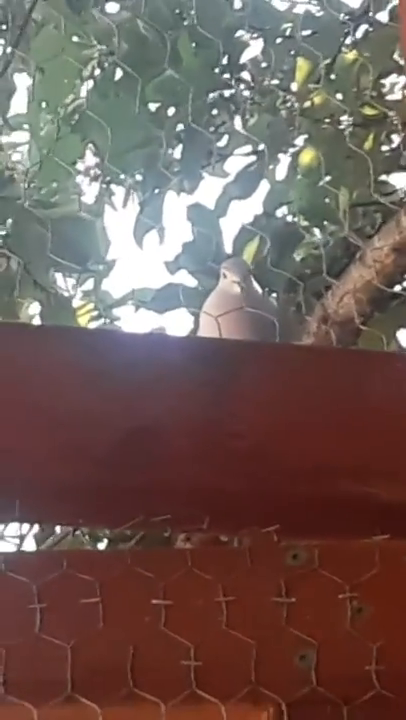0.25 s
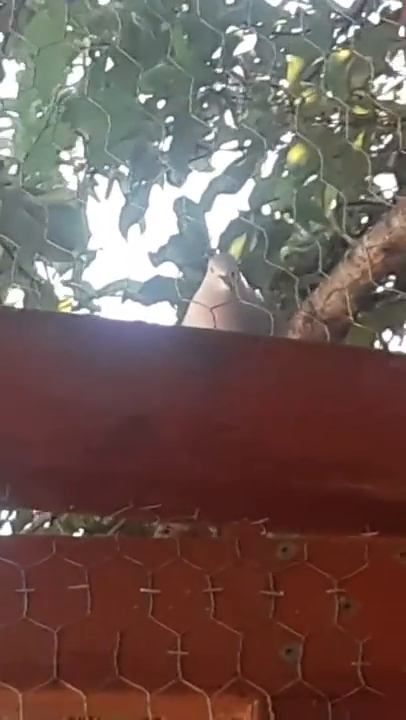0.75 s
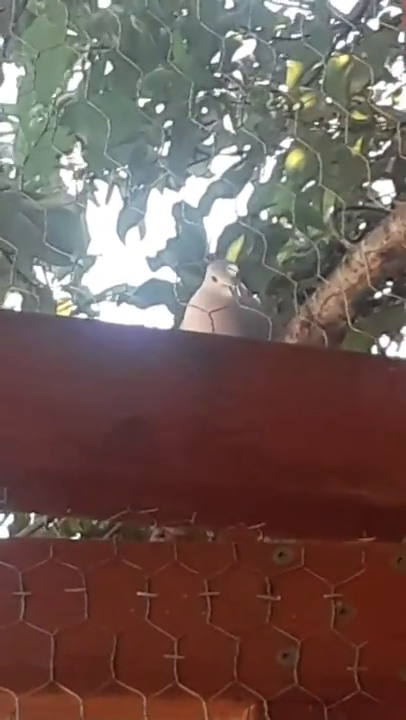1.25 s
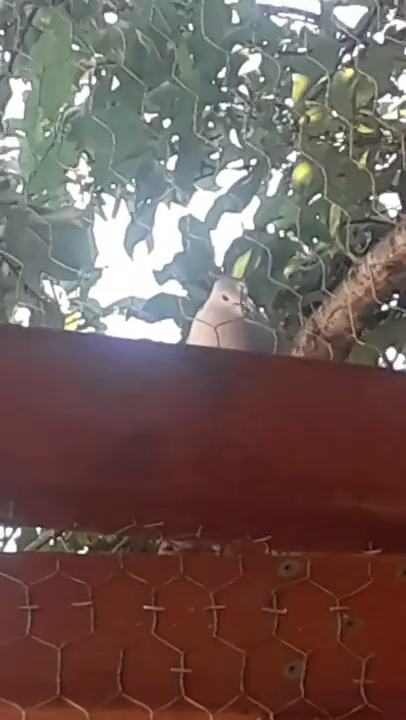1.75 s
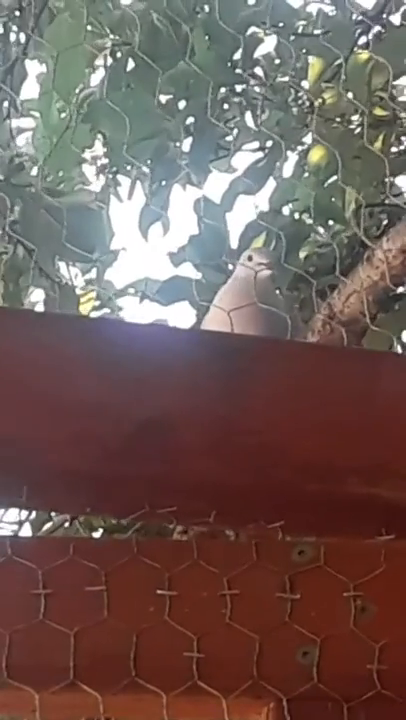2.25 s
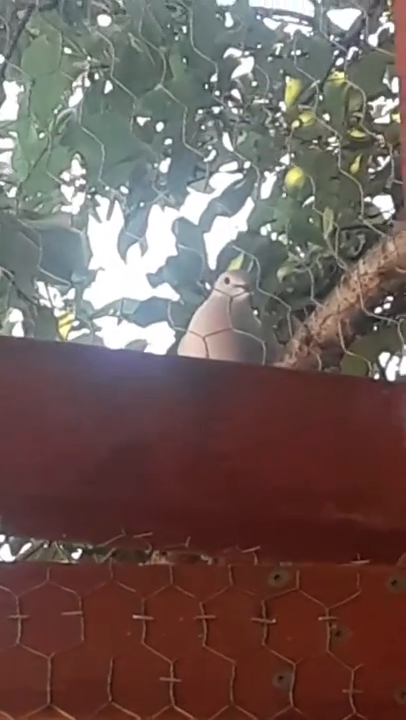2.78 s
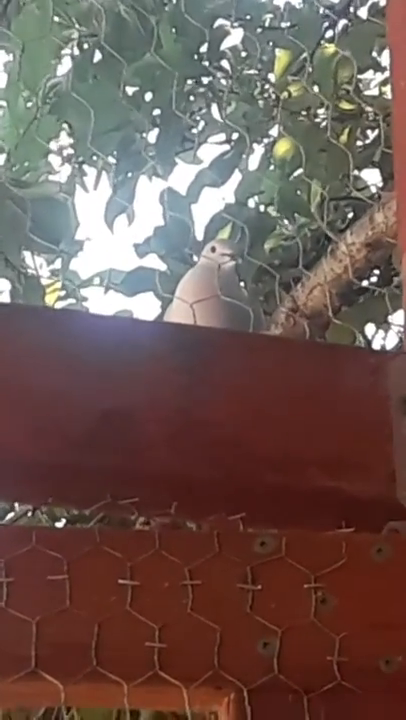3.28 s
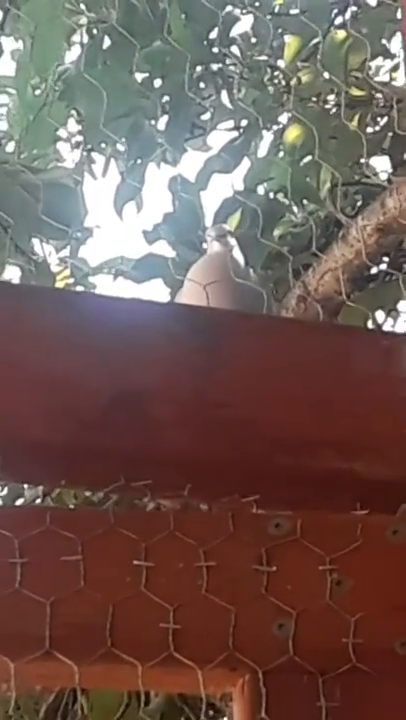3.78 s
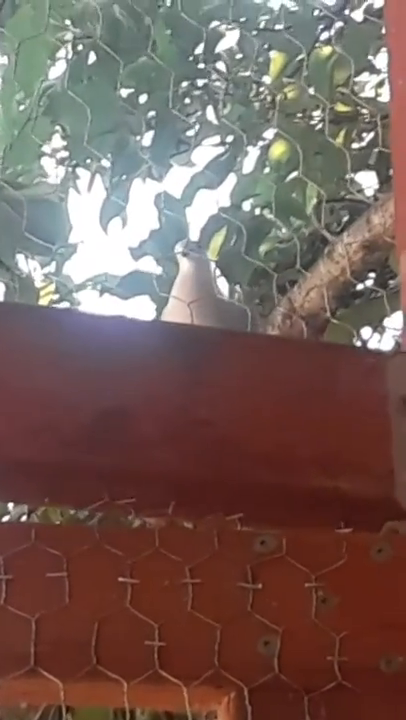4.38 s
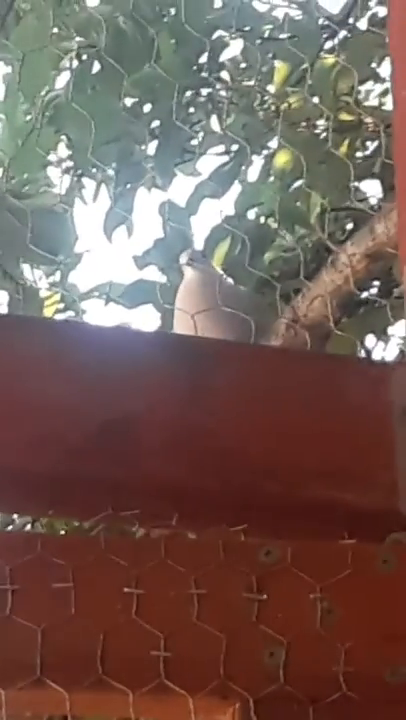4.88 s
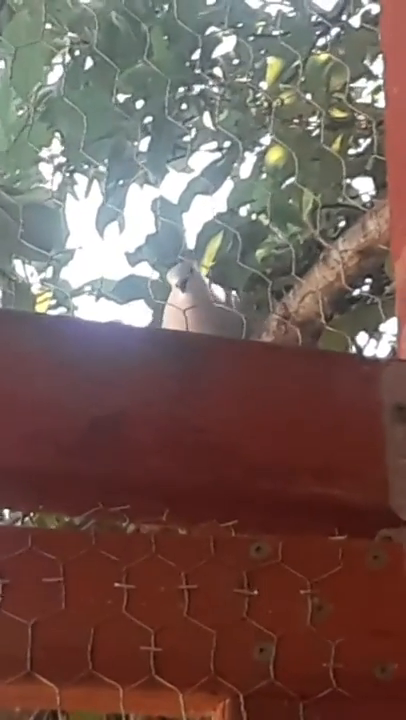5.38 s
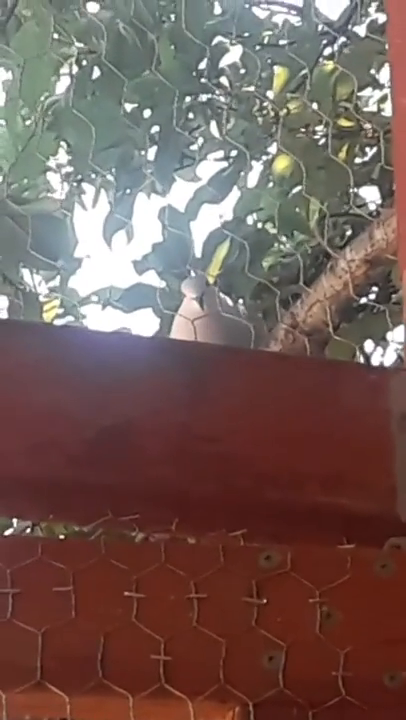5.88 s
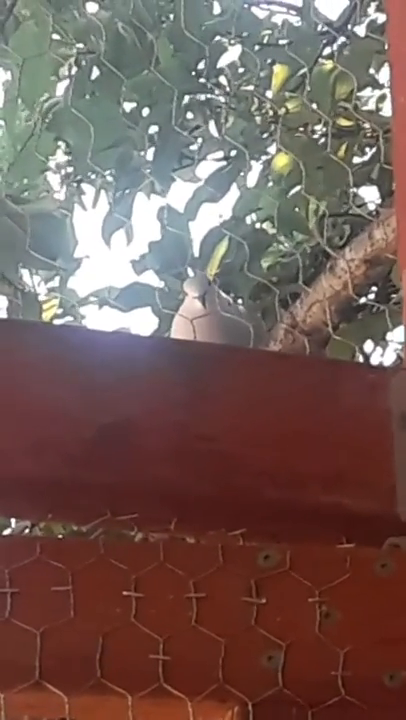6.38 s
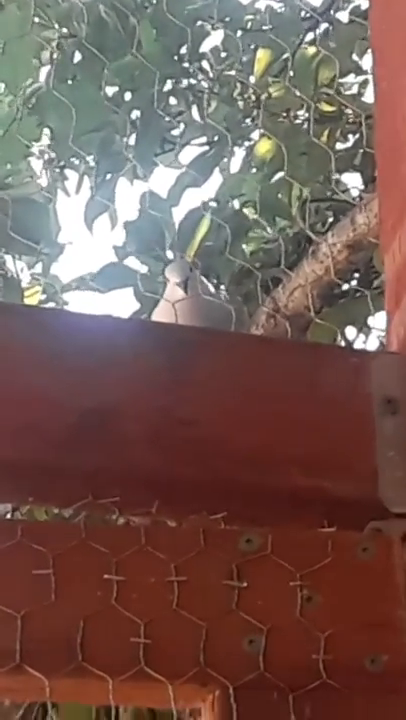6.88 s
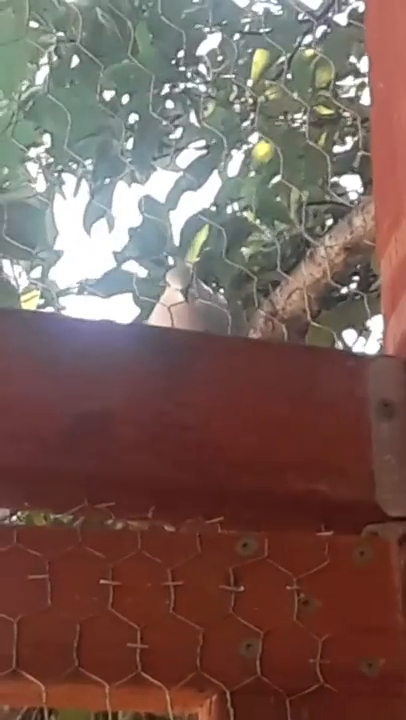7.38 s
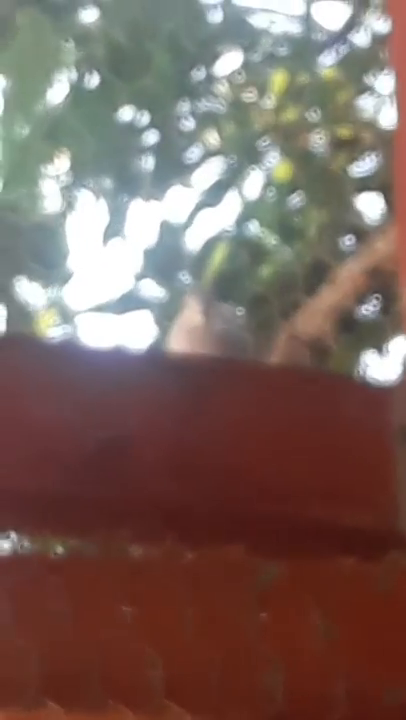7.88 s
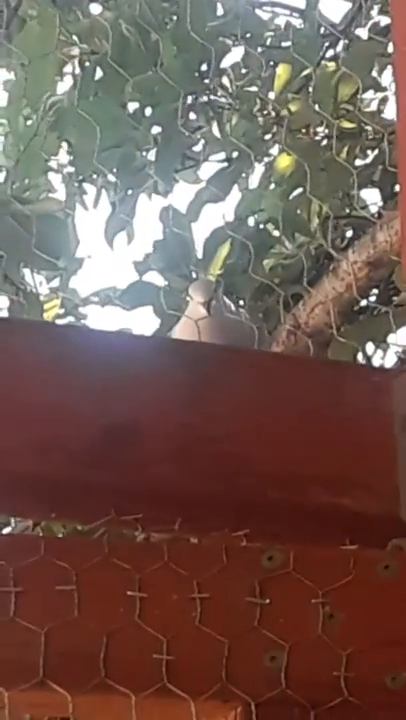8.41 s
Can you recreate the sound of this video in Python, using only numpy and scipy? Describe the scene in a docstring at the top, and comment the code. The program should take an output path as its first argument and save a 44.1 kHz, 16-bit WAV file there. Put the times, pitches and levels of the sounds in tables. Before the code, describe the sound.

A dove perched close to the microphone coos in a smooth, almost pure low tone: short note, long note, clipped closing note. After two phrases it pauses for over three seconds, letting distant chirps, thin whistles, dry rustles and small woody ticks come forward. Then it coos two more phrases. The place is a quiet leafy garden with a soft low hush and slight outdoor reflections.

```python
"""A dove close by repeats its three-note coo in a garden: a gliding, fluttering, nearly pure tone.
Further off, small birds whistle in bowed glides and chatter in pips and hoarse chirps.
Something dry rustles, as showers of tiny snaps, and ticks, as cracks with short rings.
Scattered reflections and a few echoes return over a low outdoor hush of filtered noise."""
import sys
import numpy as np
from scipy import signal
from scipy.fft import rfft, irfft, next_fast_len
from scipy.io import wavfile
from scipy.ndimage import uniform_filter1d

SR = 44100
rng = np.random.default_rng(int(sys.argv[2]) if len(sys.argv) > 2 else 0)


def wav_out(sig):
    """Save sig, one row per channel (or a flat mono array), as 16-bit PCM at SR to the path in sys.argv[1]."""
    wavfile.write(sys.argv[1], SR, np.round(np.clip(np.atleast_2d(sig).T, -1, 1) * 32767).astype(np.int16))


N = 381465  # length in samples

OPENING, LONG, CLOSING = "opening", "long", "closing"  # the three notes of the coo
PIP_S, PIP_START_HZ, PIP_END_HZ, PIP_ROUGH = .055, 2415, 2301, .3


def gain_of(db):
    """Decibels to amplitude."""
    return 10 ** (np.asarray(db) / 20)


def evened(x):
    """Scales to rms 1."""
    return x / np.sqrt(np.mean(x ** 2) + 1e-20)


def read(points, hz):
    """Reads a table of values against frequency on a log-frequency axis."""
    f, value = np.transpose(points)
    return np.interp(np.log(hz + 1), np.log(f + 1), value)


def add(mix, s, sound):
    """Mixes a sound in at time s; it may have begun before the start."""
    at = round(s * SR)
    sound = sound[max(-at, 0):]
    part = mix[max(at, 0):][:len(sound)]
    part += sound[:len(part)]


def coloured(x, spectrum):
    """Filters x by a spectrum in dB, then scales to rms 1."""
    size = next_fast_len(x.shape[-1])
    shape = gain_of(read(spectrum, np.fft.rfftfreq(size, 1 / SR)))
    filtered = irfft(rfft(x, size) * shape, size)
    return evened(filtered[..., :x.shape[-1]])


def wander(size, hz):
    """Random motion of rms about 1, mostly slower than hz."""
    lowpass = signal.butter(2, hz, fs=SR, output="sos")
    # the extra quarter second lets the filter settle
    slow = signal.sosfilt(lowpass, rng.standard_normal(size + SR // 4))
    return evened(slow)[-size:]


def envelope(t, attack_s, release_s):
    """A soft attack, a hold and a soft release."""
    rise = np.clip(t / attack_s, 0, 1)
    fall = np.clip((t[-1] - t) / release_s, 0, 1)
    return (np.sin(np.pi / 2 * rise) * np.sin(np.pi / 2 * fall)) ** 2


def diffuse(spectrum):
    """Noise from all around, nearly alike at two close microphones."""
    # Likeness of left and right. Each row: frequency in Hz, correlation 0-1.
    likeness = [(40, .998), (150, .994), (500, .99), (1500, .965), (5000, .94), (14000, .8)]
    a, b = rfft(rng.standard_normal((2, next_fast_len(N))))
    same = np.clip(read(likeness, np.linspace(0, SR / 2, len(a))), -1, 1)
    right = same * a + np.sqrt(1 - same ** 2) * b
    return coloured(irfft(np.array([a, right]))[:, :N], spectrum)


def outdoors(hush_db=-57, swell_db=1.0, hiss_db=-74.5):
    """A low far-off hush that swells slightly, and a faint steady hiss over it."""
    # Spectrum of the far-off hush. Each row: frequency in Hz, relative level in dB per Hz.
    hush_colour = [(15, -46), (30, -22), (48, -5), (85, 1.5), (125, -2), (200, -.5), (330, -4), (600, -5.5),
                   (850, -4), (1500, -13), (2000, -19.5), (3000, -28), (5000, -33), (8000, -32.5),
                   (10000, -35), (15500, -29.5)]
    # Spectrum of the faint hiss. Each row: frequency in Hz, relative level in dB per Hz.
    hiss_colour = [(1000, -8.5), (2000, 4.5), (2800, 0), (3500, -6), (4300, -3), (6000, -10), (8000, -9.5),
                   (10000, -23), (15000, -15)]
    swell = gain_of(hush_db + swell_db * wander(N, hz=5))
    return swell * diffuse(hush_colour) + gain_of(hiss_db) * diffuse(hiss_colour)


def taps(snap_db=1, body_t60=0.21, snap_t60=0.053):
    """Each tap is a sharp crack, a bright snap and a dull woody body with a few short rings."""
    # Dry ticks and taps. Each row: start in seconds, crack peak in dB, dull body in dB,
    # bright snap in dB (before snap_db).
    tap_rows = [(1.778, -49, -78, -62), (1.873, -34, -62, -46.5), (2.007, -45.5, -68, -71.5),
                (2.169, -39, -54, -61), (3.517, -46, -61, -44.5), (3.535, -37, -58, -46),
                (3.726, -49, -68, -56), (3.867, -29.5, -46.5, -62), (4.042, -58, -54, -70),
                (4.216, -46, -58, -61), (7.526, -51, -54.5, -67.5), (7.556, -45, -48.5, -60.5)]
    # Rings of a tap. Each row: frequency in Hz (before detuning), level over the body in dB,
    # t60 in seconds.
    modes = [(1550, -4, .05), (1990, 0.5, 0.091), (2910, -2.5, 0.071), (3330, -6, 0.054), (4190, -8, 0.041)]
    # Spectrum of the dull body. Each row: frequency in Hz, relative level in dB per Hz.
    body_colour = [(100, -18), (400, 2.5), (1000, 2.5), (1500, -5.5), (2000, 0.5), (2500, -8.5),
                   (3200, -12), (5000, -17.5), (9000, -32.5)]
    # Spectrum of the bright snap. Each row: frequency in Hz, relative level in dB per Hz.
    snap_colour = [(2000, -18), (4000, -14), (7500, 12.5), (10000, -12), (13000, -5.5), (16000, -0.5)]
    out, t = np.zeros(N), np.arange(SR // 5) / SR
    for s, peak, body, snap in tap_rows:
        dull = gain_of(body) * coloured(rng.standard_normal(len(t)), body_colour)
        bright = gain_of(snap + snap_db) * coloured(rng.standard_normal(len(t)), snap_colour)
        crack = (dull + bright) * np.exp(-t / .0006)
        rings = np.zeros(len(t))
        for hz, db, t60 in modes:
            detune = rng.uniform(0.94, 1.04)
            rings += gain_of(body + db - 60 * t / t60) * np.sin(2 * np.pi * hz * detune * t)
        fading = dull * gain_of(-60 * t / body_t60) + bright * gain_of(-60 * t / snap_t60)
        add(out, s, fading + rings + gain_of(peak) * crack / abs(crack).max())
    return out


def rustle(level_db=-1.0, grains_per_s=340, spread_db=3.0, ragged_db=1.65, ragged_hz=45, brush=0.58):
    """Each brush swells and dies away raggedly: many tiny snaps in three bands over a soft hiss."""
    # Brushes of something dry. Each row: start in seconds, length in seconds,
    # level in dB (before level_db and the fall).
    brushes = [(1.704, 0.068, -57.5), (1.769, 0.037, -58), (1.849, .06, -57), (1.9, 0.11, -67.5),
               (2.38, 0.071, -62), (3.47, 0.088, -50.5), (3.535, 0.091, -45), (3.627, 0.12, -58),
               (3.749, 0.11, -56), (3.869, 0.073, -60), (4.025, 0.097, -62), (4.14, 0.18, -60),
               (4.398, 0.11, -58.5), (4.719, 0.1, -58), (4.788, .12, -59.5), (4.929, .04, -58.5),
               (6.29, 0.1, -73)]
    # Pitch ranges of the tiny snaps. Each row: low edge in Hz, high edge in Hz.
    bands = [(1500, 5000), (5000, 9000), (9000, 16000)]
    # Spectrum of the rustle. Each row: frequency in Hz, relative level in dB per Hz.
    rustle_colour = [(1470, -11), (2500, -3), (2760, -8), (3600, -12), (4070, -10.5), (5370, -11.5),
                     (7320, -6.5), (9300, -17.5), (14000, -12), (15900, -15)]
    attack_s, release_s, fall_db = .012, .025, -5.5
    level, grains = np.zeros(N), np.zeros(N)
    for s, length, db in brushes:
        t = np.arange(0, length, 1 / SR)
        add(level, s, gain_of(db + fall_db * t / length) * envelope(t, attack_s, release_s))
    for band in bands:
        strength = gain_of(spread_db * np.minimum(rng.exponential(1, N), 3.4))
        snaps = (rng.random(N) < grains_per_s / SR) * strength
        # each snap dies with a 0.9 ms time constant
        decays = signal.lfilter([1], [1, -np.exp(-1 / (0.0009 * SR))], snaps)
        bursts = decays * rng.standard_normal(N)
        grains += signal.sosfilt(signal.butter(2, band, "bandpass", fs=SR, output="sos"), bursts)
    level *= gain_of(level_db + ragged_db * wander(N, hz=ragged_hz))
    return level * coloured(evened(grains) + brush * rng.standard_normal(N), rustle_colour)


def chirp(length, start_hz, end_hz, rough, rasp=.085, rasp_hz=380, rasp_depth=0.57, edge_share=0.15):
    """A quick glide; in a hoarse one pitch and loudness shake fast enough to smear the line."""
    t = np.arange(0, max(length, .01), 1 / SR)
    glide = np.linspace(start_hz, end_hz, len(t))
    hz = glide * (1 + rasp * rough * wander(len(t), rasp_hz))
    edge_s = edge_share * length
    loudness = envelope(t, edge_s, edge_s) * (1 + rasp_depth * rough * wander(len(t), rasp_hz))
    return evened(loudness * np.sin(2 * np.pi * np.cumsum(hz) / SR))


def chatter(far_db=-80, far_low_hz=2300, far_high_hz=2900, far_rough=0.34, count=30):
    """The pips, the hoarse chirps and a random scatter of faint pips from birds further off."""
    # A small bird repeats one falling pip. Each row: start in seconds, level in dB.
    pip_rows = [(.865, -64.5), (.972, -56.5), (1.105, -58), (1.25, -71), (1.37, -73), (1.59, -69.5),
                (1.74, -70), (2.17, -70), (2.285, -72), (2.495, -66), (2.605, -67.5), (3.11, -63.5),
                (3.215, -60), (3.33, -59), (3.435, -59), (3.705, -54), (3.824, -53), (3.915, -52.5)]
    # Hoarse chirps. Each row: start in seconds, length in seconds, start pitch in Hz,
    # end pitch in Hz, level in dB, roughness (0 is smooth, about 1 is hoarsest).
    chirp_rows = [(0.119, .09, 5200, 4870, -63, .2), (.134, 0.15, 5450, 5700, -70.5, .6),
                  (1.089, 0.14, 2850, 2850, -70, 0.89), (1.845, .047, 1880, 1903, -52.5, .08),
                  (2.77, 0.076, 4200, 3900, -62, 0.22), (2.823, .044, 2545, 2650, -61, 0.73),
                  (2.923, .05, 2950, 2530, -57.5, 0.53), (3.008, .135, 3276, 2556, -60, .28),
                  (3.256, 0.052, 4100, 3590, -60.5, 0.7), (3.284, .065, 3780, 4420, -66, 1),
                  (3.45, 0.15, 1598, 1960, -62, .45), (3.55, 0.049, 1884, 1950, -49, 0.36),
                  (3.64, .085, 5500, 4270, -64.5, .3), (3.78, 0.22, 1990, 1893, -62.5, .9),
                  (3.757, 0.0253, 2930, 3640, -59.5, 0.76), (3.802, 0.032, 3360, 2640, -56.5, .65),
                  (3.885, 0.039, 3700, 2700, -48.5, 0.4), (4.086, .097, 2330, 2095, -57.5, 0.84),
                  (4.111, .21, 1644, 2140, -62, 0.71), (4.44, .11, 2390, 2100, -57.5, 0.62),
                  (4.62, .1, 1870, 1897, -61.5, 0.74), (4.808, 0.034, 2520, 3420, -55.5, .7),
                  (4.832, 0.08, 2390, 2154, -53, 0.48), (4.9, .12, 1990, 1907, -60, .75),
                  (4.999, 0.101, 1908, 1880, -56.5, .7), (8.129, .12, 2695, 2730, -70.5, 1.03)]
    out = np.zeros(N)
    for s, db in pip_rows:
        add(out, s, gain_of(db) * chirp(PIP_S, PIP_START_HZ, PIP_END_HZ, PIP_ROUGH))
    for s, length, start_hz, end_hz, db, rough in chirp_rows:
        add(out, s, gain_of(db) * chirp(length, start_hz, end_hz, rough))
    for when, pitch in rng.random((count, 2)):
        hz = far_low_hz + pitch * (far_high_hz - far_low_hz)
        far_pip = chirp(PIP_S, hz, hz * PIP_END_HZ / PIP_START_HZ, far_rough)
        add(out, when * N / SR, gain_of(far_db) * far_pip)
    return out


def whistles(jitter=0.0034, edge_share=0.22):
    """Nearly pure tones that swell and fade along a bowed glide."""
    # A songbird's thin whistles, some two at once. Each row: start in seconds, length in seconds,
    # start pitch in Hz, end pitch in Hz, bow of the glide in Hz, level in dB.
    whistle_rows = [(0, .13, 5610, 5600, -0.5, -72.5), (.28, 0.26, 4790, 4200, -79.5, -60.5),
                    (2.85, 0.13, 3850, 4030, 1, -65), (2.91, .27, 5550, 4810, -110, -67),
                    (4.4, .19, 3780, 3770, 0, -77), (4.495, 0.064, 5600, 5080, -120, -66),
                    (4.563, 0.097, 5080, 4320, -2, -63), (4.839, .14, 2840, 3640, 171, -57),
                    (4.84, .13, 4070, 4900, 150, -71), (5.0, .14, 3765, 3450, 320.5, -57.5),
                    (5.119, .085, 3450, 3174, -60.5, -62), (7.069, .41, 5540, 5260, 40.5, -68),
                    (7.09, .06, 4600, 4150, 0, -69), (7.128, 0.34, 4150, 3835, -80, -72.5),
                    (8.168, .17, 4120, 4070, 1, -82)]
    out = np.zeros(N)
    for s, length, start_hz, end_hz, bow_hz, db in whistle_rows:
        t = np.arange(0, length, 1 / SR)
        hz = np.linspace(start_hz, end_hz, len(t)) + bow_hz * np.sin(np.pi * t / length)
        phase = 2 * np.pi * np.cumsum(hz * (1 + jitter * wander(len(t), hz=200))) / SR
        edge_s = edge_share * length
        add(out, s, gain_of(db) * evened(envelope(t, edge_s, edge_s) * np.sin(phase)))
    return out


def dove(flutter=.03, flutter_hz=82, air_db=-41, octave_db=-48, hz_per_db=3, threshold=.02):
    """Effort swells, holds and dies, and pitch follows it; the swollen throat passes almost only the fundamental."""
    # Coos, timed from about half loudness to half loudness. Each row: note, start in seconds,
    # length in seconds, fall time in seconds, level in dB at full effort, base pitch in Hz.
    coos = [(LONG, -.31, 0.4064, 0.02, -20.5, 470.3), (CLOSING, .363, 0.063, .0105, -19.5, 476.5),
            (OPENING, 0.9283, .142, .0073, -19, 471), (LONG, 1.2184, 0.4, .0215, -19.5, 471.4),
            (CLOSING, 1.904, .067, 0.0093, -19.5, 474), (OPENING, 5.587, 0.13, .0045, -20.5, 472.6),
            (LONG, 5.881, 0.39, .0127, -19.4, 475.7), (CLOSING, 6.547, 0.076, .0125, -19.3, 478),
            (OPENING, 7.154, .124, .0045, -19.3, 470), (LONG, 7.427, 0.43, .021, -20, 468.8),
            (CLOSING, 8.133, 0.062, 0.0108, -19, 473)]
    # Shape of each note. Each entry: rise time in seconds, share of effort lost by the end,
    # sag of pitch in Hz, arch of pitch in Hz.
    note_shapes = {OPENING: (.0108, .02, 4, 10), LONG: (0.0022, .46, -0.5, 3), CLOSING: (.0058, -.07, 6, 0)}
    # Spectrum of the breath noise. Each row: frequency in Hz, relative level in dB per Hz.
    air_colour = [(60, -10), (120, -1), (200, 9), (300, 0), (400, -2), (570, -2), (690, -8.5), (850, .5),
                  (1500, -12), (4000, -34.5)]
    tone, effort = np.zeros(N), np.zeros(N)
    for note, s, length, fall_s, db, base_hz in coos:
        rise_s, droop, sag_hz, arch_hz = note_shapes[note]
        t = np.arange(-4 * rise_s, length + 4 * fall_s, 1 / SR)
        along = np.clip(t / length, 0, 1)
        rise, fall = 1 + np.exp(-t / rise_s), 1 + np.exp((t - length) / fall_s)
        push = (1 - droop * along ** 2) / rise / fall
        # below this share of full effort the voice stops
        push = np.maximum(push - threshold, 0) / (1 - threshold)
        effort_hz = hz_per_db * 20 * np.log10(push + 1e-3)
        hz = base_hz + effort_hz - sag_hz * along + arch_hz * np.sin(np.pi * along)
        level = np.sqrt(2) * gain_of(db) * push
        # a quick, uneven flutter of the membranes shakes loudness and pitch together
        shake = 2 * np.pi * np.cumsum(flutter_hz * (1 + .3 * wander(len(t), hz=30.6))) / SR
        phase = 2 * np.pi * np.cumsum(hz) / SR + flutter * np.sin(shake)
        unsteady = 1 + flutter * np.cos(shake) + .025 * wander(len(t), hz=50)
        voice = np.sin(phase) + gain_of(octave_db) * np.sin(2 * phase)
        add(tone, s + t[0], level * unsteady * voice)
        add(effort, s + t[0], level)
    air = coloured(rng.standard_normal(N), air_colour)
    return tone + gain_of(air_db) * effort * air


def walls(x):
    """A few distinct echoes; they beat against the gliding end of each note."""
    # Echoes of the coo. Each row: delay in seconds, level in dB below the direct sound's 0.
    echo_rows = [(0.049, -31), (.075, -33), (.105, -30)]
    out = x.copy()
    for delay_s, db in echo_rows:
        add(out, delay_s, gain_of(db) * x)
    return out


def garden(x, wet_db, left_db, width, delay_s):
    """Places a source: direct sound plus scattered reflections, each band dying at its own speed."""
    # Decay of the reflections. Each row: frequency in Hz, t60 in seconds.
    decay = [(300, .36), (600, .36), (2500, .33), (6000, .28), (14000, .2)]
    size = SR * 3 // 5
    hits = rng.random(size) < 2000 / SR  # about 2000 reflections a second
    scatter = rng.standard_normal((2, size)) * hits * (np.arange(size) > delay_s * SR)
    hz, t, z = signal.stft(scatter, SR, nperseg=256)
    fading = z * gain_of(-60 * t / read(decay, hz)[:, None])
    tail = signal.istft(fading, SR, nperseg=256)[1]
    tail = tail / np.linalg.norm(tail[0])
    mid, side = gain_of(wet_db) * signal.oaconvolve(x[None], tail, axes=1)[:, :N]
    placed = np.array([x + mid + width * side, x + mid - width * side])
    return placed * gain_of([[left_db / 2], [-left_db / 2]])


def scene():
    """The hush, the rustling and taps, the farther birds and the near dove."""
    dry_stuff = garden(rustle() + taps(), wet_db=-8.5, left_db=-1.0, width=.6, delay_s=.003)
    birds = garden(whistles() + chatter(), wet_db=-6, left_db=-.9, width=.35, delay_s=.003)
    near_dove = garden(walls(dove()), wet_db=-25, left_db=0.63, width=.25, delay_s=.025)
    return outdoors() + dry_stuff + birds + near_dove


def running_db(x, sense_s=.2):
    """Level of a stereo sound, averaged over sense_s."""
    power = uniform_filter1d((x ** 2).mean(0), int(sense_s * SR))
    return 10 * np.log10(abs(power) + 1e-12)


def record(dry):
    """A noise suppressor dulls the quiet moments and opens for loud or bright sounds; then the band limit."""
    suppress_db, suppress_above_hz, edge_hz = -3, 1500, 15900
    quiet_db, quiet_treble_db, knee_db = -50.5, -68.5, 9.5
    highpass = signal.butter(2, suppress_above_hz, "highpass", fs=SR, output="sos")
    treble = signal.sosfiltfilt(highpass, dry)
    over_db = np.maximum(running_db(dry) - quiet_db, running_db(treble) - quiet_treble_db)
    shut = 1 - np.clip(over_db / knee_db, 0, 1)  # 1 in quiet, 0 when fully open
    out = dry + treble * (gain_of(suppress_db * shut) - 1)
    lowpass = signal.firwin(511, edge_hz, window=("kaiser", 9), fs=SR)
    return signal.oaconvolve(out, lowpass[None], "same")


dry = scene()
out = record(dry)
wav_out(out)
```